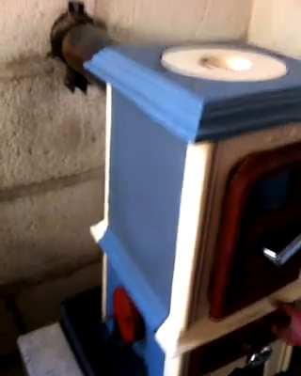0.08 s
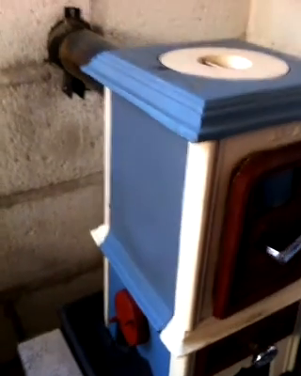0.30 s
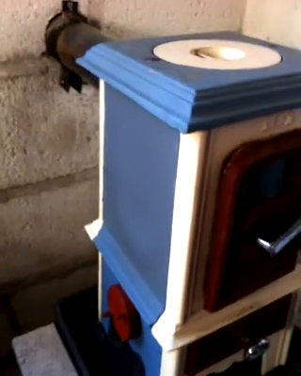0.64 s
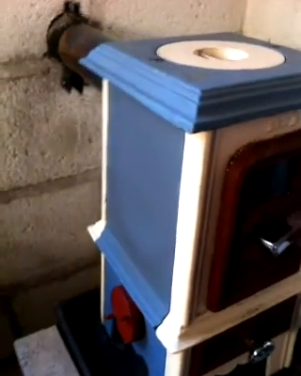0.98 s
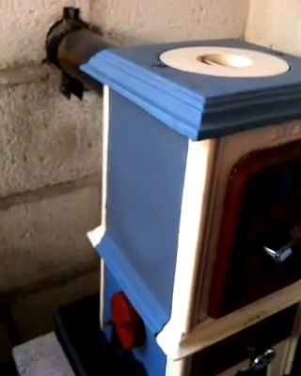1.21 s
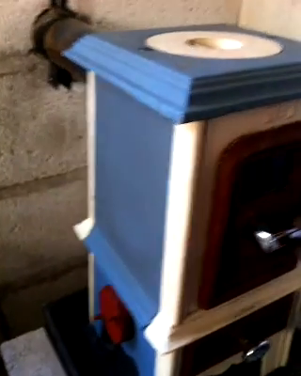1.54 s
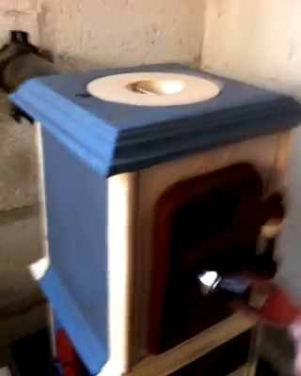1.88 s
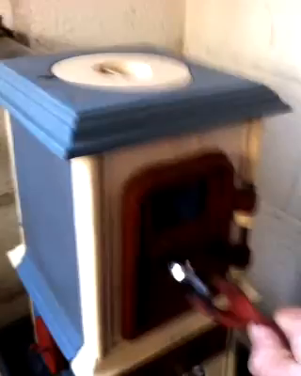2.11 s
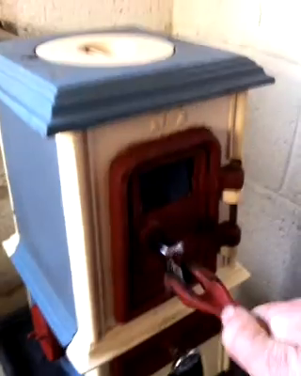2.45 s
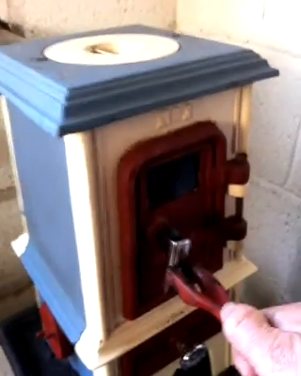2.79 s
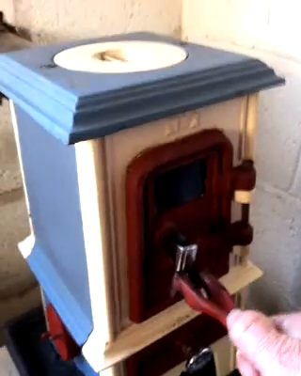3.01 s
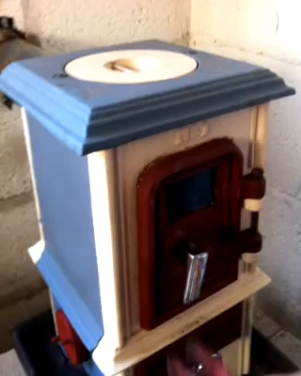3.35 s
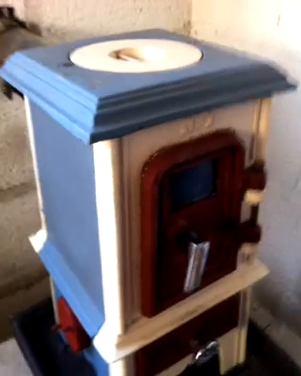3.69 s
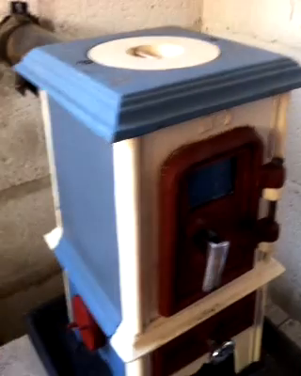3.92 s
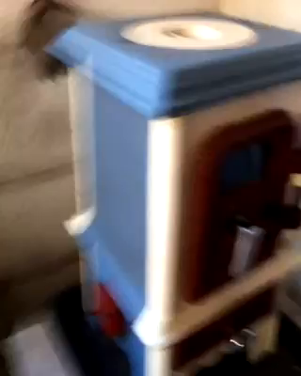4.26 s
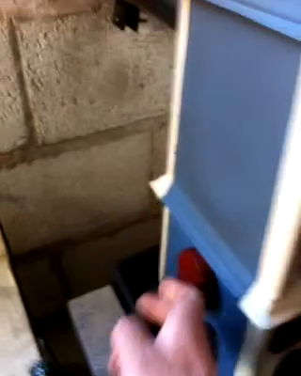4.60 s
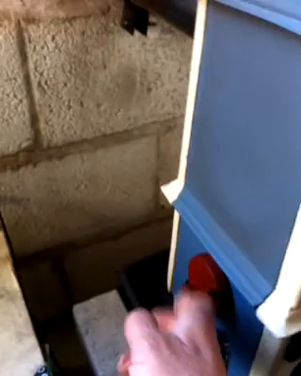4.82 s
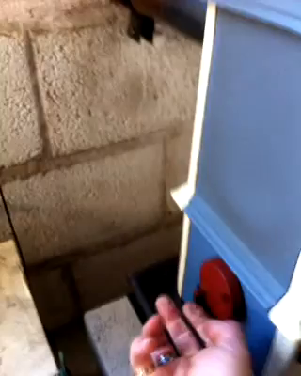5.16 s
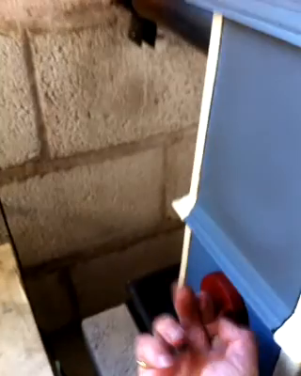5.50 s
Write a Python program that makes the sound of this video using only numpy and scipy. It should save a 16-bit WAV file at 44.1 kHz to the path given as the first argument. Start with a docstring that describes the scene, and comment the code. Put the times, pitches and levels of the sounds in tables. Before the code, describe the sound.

Fingers rub and tick on a hand-held microphone in a quiet garage. Then come scattered clusters of close, ringing clinks and scrapes as an iron tool works a small stove's door handle, with a faint rising squeak. Two louder clanks follow as the tool is put down, then the stove's air wheel rattles and settles. Faint sleeve rustle and room air lie underneath.

```python
"""Fingers rub and tick on a hand-held camera's case and a sleeve rustles, over faint room air.
Close by, an iron lifting tool clinks and scrapes on the latch of a small cast-iron stove; a pivot squeaks.
The tool turns the door handle and clanks down on the tray; then the air wheel rattles and rocks to rest.
Every contact chatters briefly and rings the iron's modes; the garage's block walls add a short echo."""
import sys
import numpy as np
from scipy import signal
from scipy.fft import rfft, irfft, next_fast_len
from scipy.io import wavfile

SR = 44100
rng = np.random.default_rng(int(sys.argv[2]) if len(sys.argv) > 2 else 0)


def write(x):
    x = np.atleast_2d(x).T
    wavfile.write(sys.argv[1], SR, np.round(np.clip(x, -1, 1) * 32767).astype(np.int16))


N = 251811
RING_N = int(.5 * SR)
TIME_S = np.arange(N) / SR
AGE_S = np.arange(RING_N) / SR


def undb(db):
    """Decibels to gain."""
    return 10 ** (np.asarray(db) / 20)


def unit_rms(x):
    """Scale to rms 1."""
    return x / np.sqrt(np.mean(x ** 2))


def decay(t60_s):
    """Exponential envelope, RING_N samples."""
    return np.exp(-np.log(1000) * AGE_S / t60_s)


def add(out, time_s, sound):
    """Mix a sound in at time_s."""
    start = max(int(time_s * SR), 0)
    out[start:start + len(sound)] += sound[:len(out) - start]


def colour(x, points):
    """Minimum-phase filter through (frequency [Hz], gain [dB]) points."""
    size = next_fast_len(len(x) + RING_N, True)
    size += size % 2
    hz, db = np.transpose(points)
    bin_hz = np.arange(size // 2 + 1) * SR / size
    gain = undb(np.interp(np.log(bin_hz + 1), np.log(hz), db))
    cepstrum = irfft(np.log(gain))
    cepstrum[1:size // 2] *= 2
    cepstrum[size // 2 + 1:] = 0
    return irfft(rfft(x, size) * np.exp(rfft(cepstrum)))[:len(x)]


# Finger pushes on the case: (time [s], level [dB])
FINGER_TICKS = [(0.0751, -33.5), (.117, -47), (.852, -40), (1.7667, -31), (1.875, -37), (4.24, -35),
                (4.2569, -28.5), (4.3185, -33.5)]


def fingers(half_width_s=.00028, lead_s=.0041, grip_db=-57, hold_s=.097, release_db_per_s=130):
    """Dry pushes reach the microphone through the case; a low rub dies as the grip settles."""
    pushes = np.zeros(N)
    pulse = -np.exp(-(AGE_S / half_width_s - 3) ** 2)
    for time_s, db in FINGER_TICKS:
        start_s = time_s - 3 * half_width_s
        add(pushes, start_s - lead_s, undb(db - 11) * pulse)  # lighter touch first
        add(pushes, start_s, undb(db) * pulse)
    ticks = signal.sosfilt(signal.butter(2, 170, "high", fs=SR, output="sos"), pushes)
    rub_spectrum = [(70, -34), (180, -7.5), (280, -6.5), (600, -13), (1400, -17.5), (4000, -34)]
    rub = unit_rms(colour(rng.standard_normal(N), rub_spectrum))
    grip = undb(grip_db - release_db_per_s * np.maximum(TIME_S - hold_s, 0))
    return ticks + rub * grip


# Arm moves: (centre time [s], level [dB], half-width [s])
SLEEVE_STROKES = [(.1, -63, 0.52), (1.4, -63, 0.48), (2.448, -70.5, 0.51), (4.0, -58.5, 0.38),
                  (4.5, -61.5, 0.28), (5.12, -64, 0.2), (5.58, -67, 0.15)]


def sleeve():
    """Cloth hisses, swelling and fading with each move of the arm."""
    spectrum = [(1000, -18), (4000, -10.5), (6500, -3), (8500, -.5), (9800, -8.5), (11500, -28)]
    hiss = unit_rms(colour(rng.standard_normal(N), spectrum))
    swells = [undb(db) * np.exp(-((TIME_S - centre_s) / half_width_s) ** 2)
              for centre_s, db, half_width_s in SLEEVE_STROKES]
    return hiss * np.linalg.norm(swells, axis=0)


# Still-room spectrum: (frequency [Hz], relative level [dB])
AIR_SPECTRUM = [(18, -63.5), (30, -27.5), (234, -1.5), (428, -7), (473, -6.5), (623, -7), (1230, -10),
                (2350, -13), (5800, -15), (8880, -10.5), (12000, -34), (15600, -65.5), (22000, -120)]


def room_air(rms_db=-69):
    """Steady faint noise of the still room."""
    return undb(rms_db) * unit_rms(colour(rng.standard_normal(N), AIR_SPECTRUM))


# Response to contact: part -> (bass [dB], top [dB], ring [dB], rebound [dB])
PART_RESPONSE = { "latch": (-2, 1, 2.5, -10.5), "jaw": (-10, -8, -0.5, -32), "shank": (-19, -2, -2.5, -22),
                 "pivot": (-6, -5.5, -3, -19.5), "catch": (-7, -9.5, -6, -26),
                 "spindle": (-1.5, -5.5, -3.5, -15), "handle": (-3, -13, 3, -11.5),
                 "tray": (-22.5, -6.5, 5.5, -16), "base": (-27, -9.5, 1.5, -14.5),
                 "wheel": (-28, -15, 4, -12), }
# Clinks and clanks: (time [s], part voicing it, level [dB], treble tilt [dB/oct], chatter [ms])
# The row at 3.684 s is a very faint high tick.
CLINKS = [ (0.6989, "latch", -38.5, -1.46, 5.4), (0.9317, "jaw", -32, 2, 1.4),
          (1.0448, "shank", -40.5, 5, 5.7), (1.265, "shank", -72, 9, 4.4), (1.452, "pivot", -33.5, 4, 6.2),
          (1.610, "pivot", -29, 2.4, 4.1), (1.6194, "catch", -36, 11.5, 0.77),
          (2.0096, "latch", -36.5, 1, 4.3), (2.0205, "catch", -25, 2.5, 2.2),
          (2.2765, "spindle", -37.5, -3.5, 9.4), (2.288, "spindle", -44, 3, 1),
          (2.61, "jaw", -51.5, -0.5, 10.5), (3.1117, "handle", -44, 4.5, 0.51),
          (3.684, "shank", -68, 3.5, .7), (3.7812, "tray", -24.5, -0.16, 11),
          (4.045, "base", -20.5, 0.6, 3.4), (4.439, "wheel", -26, 3.5, 7.1),
          (4.598, "wheel", -35, -0.5, 5.8), (4.665, "wheel", -31, 0.5, 8.8), ]


def clinks(rebound_s=.026, rebound_ms=5.5):
    """Yield contacts: each clink, clank or tick, then its weaker, dry rebound."""
    for time_s, part, db, tilt_db_oct, chatter_ms in CLINKS:
        rebound_db = PART_RESPONSE[part][-1]
        yield time_s, part, "hard", db, tilt_db_oct, chatter_ms
        yield time_s + rebound_s, part, "rebound", db + rebound_db, tilt_db_oct, rebound_ms


def mode_pairs(hz, t60_s, split_hz=(11, 24.2), twin_gain=.4):
    """One decaying tone per mode; uneven castings add a weaker twin that drifts out of step."""
    phase = 2 * np.pi * rng.random((len(hz), 1))
    twin_hz = hz + rng.choice([-1, 1], len(hz)) * rng.uniform(*split_hz, len(hz))
    tone = np.sin(2 * np.pi * hz[:, None] * AGE_S + phase)
    twin = np.sin(2 * np.pi * twin_hz[:, None] * AGE_S + phase)
    return (tone + twin_gain * twin) * decay(t60_s[:, None])


# Struck places: (latch, handle, tray, base, wheel)
STOVE_PLACES = ("latch", "handle", "tray", "base", "wheel")
# Ironwork modes: (frequency [Hz], t60 [s], then level [dB] at each place)
IRON_MODES = [ (247, 0.44, -25.5, -26, -2, 1, 3), (411.6, 0.25, -13.5, -21, 2.5, 5, -29),
              (639.3, .24, 0.5, 3, -4.5, 2, -5.5), (648.1, 0.27, -19.5, -18, -8, 2.5, -22),
              (862, 0.23, -15, -56, -18, -14.5, -16.5), (938, 0.26, -16, -40, -10.5, -11.5, -11),
              (966.4, 0.19, -18, -23, 7, -3, 2.5), (989, 0.13, -14, -3.5, 2.5, 3.5, 9.5),
              (1024, .20, -9, -32, -5.5, -11.5, -9), (1198, 0.27, -10, -1, -2.5, -9, -14),
              (1250, 0.26, -4.5, -1, -3, -16, 1), (1557, .22, -7, -6.5, -20.5, -22.5, -15.5),
              (1660, 0.26, -29.5, -30, 1.5, -25.5, -3), (1763, 0.19, -7, -8.5, -3, 4, -5),
              (1817, 0.36, -21.5, -30, -14, -16.5, -11), (1954, 0.22, -18.5, -39, -12.5, -7, -10),
              (2000, 0.3, -16, -39, -7, -22, -24), (2106, 0.3, -14, -19.5, -12.5, -22.5, -22),
              (2157, 0.23, -11, -19, -4.5, -18, -14.5), (2370, 0.34, -18, -22, -14, -16.5, -24),
              (2465, 0.28, -21, -33, -23, -15, -16), (2746, 0.1, -5, -5, -22.5, -20, -28.5),
              (2869, 0.27, -12.5, -21, -20, -10.5, -37.5), (3117, 0.17, -20.5, -37, -22.5, -1, -4),
              (3200, 0.15, -20.5, -27, -22.5, -3, -4.5), (3991, 0.26, -21.5, -25, -14, 4, -15.5),
              (4085, 0.1, -11.5, -12, -8, -14.5, -7.5), (4240, 0.17, -19.5, -19, -21, -11.5, -11.5),
              (4745, .23, -20.5, -31, -15, -7.5, -32.5), (5247, 0.16, -8.5, 0, 2.5, -15.5, -23), ]
# Lifting-tool overtones: (frequency [Hz], t60 [s], then level [dB] at each place)
TOOL_MODES = [ (5950, 0.092, -4, -10.5, -4.5, -8.5, -34.5), (7810, 0.13, -10.5, -9, -4, -6.5, -6.5),
              (9086, 0.12, -12.5, 2, -19, -17, -3.5), (10120, 0.1, -16.5, -6, -1.5, -13.5, -10.5), ]
# Small steel parts at the latch: part -> rows of (frequency [Hz], t60 [s], level [dB])
FITTING_MODES = { "jaw": [(1593, 0.14, -27), (2910, 0.26, -7.5), (3970, 0.115, 2), (5330, 0.1, -7.5),
                 (5740, 0.098, -10), (9100, 0.065, -0.5)], "shank": [(2750, 0.098, 7.5), (4600, 0.2, -3.5),
                 (6459, 0.1, -2.5), (7260, 0.2, -4), (8080, 0.1, -3.5), (9266, 0.035, 12.5)],
                 "pivot": [(2084, 0.25, -2.5), (2020, 0.25, -8), (2680, 0.2, -4.5), (6380, .13, -5.5),
                 (7950, 0.16, 1.5), (8560, 0.14, -5)], "catch": [(636, 0.23, -0.5), (815, 0.15, 6.5),
                 (1290, 0.099, -8), (2780, 0.098, 2.5), (5020, 0.11, 2.5), (4940, 0.25, -9.5),
                 (5325, 0.12, -1.5), (5845, 0.051, -9), (5595, 0.063, -9.5), (7800, 0.18, -14)],
                 "spindle": [(1600, 0.12, 3), (2056, 0.34, 3.5), (2298, 0.22, 2), (3720, 0.11, -1.5),
                 (4270, 0.076, -11), (6320, 0.038, 9.5), (8400, 0.068, 3.5)], }


def part_modes():
    """Each place weights the shared modes; a fitting adds its own to those of the latch."""
    hz, t60_s, *place_db = np.transpose(IRON_MODES + TOOL_MODES)
    shared = mode_pairs(hz, t60_s)
    modes = {place: undb(db)[:, None] * shared for place, db in zip(STOVE_PLACES, place_db)}
    for part, rows in FITTING_MODES.items():
        hz, t60_s, db = np.transpose(rows)
        own = undb(db)[:, None] * mode_pairs(hz, t60_s)
        modes[part] = np.vstack([modes["latch"], own])
    return modes


def chatter(chatter_ms, impacts_per_s=2500):
    """Rough faces meet in a run of tiny dying impacts; energy 1."""
    taps = rng.standard_normal(RING_N) * (rng.random(RING_N) < impacts_per_s / SR)
    taps[0] = 1
    taps *= np.exp(-AGE_S / (chatter_ms / 1000))
    return taps / np.linalg.norm(taps)


def clash(chatter_ms, crack_db=3.5, crack_t60_s=.035, wash_db=-4, wash_t60_s=.18):
    """Modes too dense to resolve: a crack drawn out by the contact, then a duller wash."""
    pink = [(100, 23.4), (10000, 3.4)]
    crack = colour(rng.standard_normal(RING_N), pink)
    wash = colour(rng.standard_normal(RING_N), pink)
    wash = colour(wash, [(3000, 0), (10000, -4)])
    contact = np.exp(-AGE_S / (chatter_ms / 1000))
    out = np.zeros(RING_N)
    for noise, db, t60_s in (crack, crack_db, crack_t60_s), (wash, wash_db, wash_t60_s):
        power = signal.fftconvolve(decay(t60_s) ** 2, contact / contact.sum())[:RING_N]
        out += undb(db) * np.sqrt(np.abs(power)) * noise
    return out


# Manner of contact: touch -> (tilt corner [Hz], bass [dB], ring [dB])
TOUCH_RESPONSE = {"hard": (1333, 0, 0), "rebound": (1400, 8.7, -12.5), "drag": (1400, -2, 6),
                  "soft": (750, 1.3, -4.5)}
# Contact filter points: (bass [Hz], low middle [Hz], high middle [Hz], treble [Hz], top [Hz])
BANDS_HZ = (300, 750, 1400, 5000, 8800)
# Colour common to all contacts: (frequency [Hz], gain [dB])
IRON_COLOUR = [(50, -40), (100, -23.5), (140, -12), (220, -2), (480, -6), (640, -2), (1000, 0), (1420, -1),
               (1900, -2), (3400, -4), (5200, -2.5), (6800, 0), (9000, -1.5), (11500, -23.5)]


def ironwork(weak_count=130, weak_db=-21, weak_t60_s=.071, rise_share=.2, spot_spread_db=.93):
    """Each contact rings its part's modes, a crowd of weak modes and the clash."""
    modes = part_modes()
    weak_hz = rng.uniform(1100, 10500, weak_count)
    weak_modes = mode_pairs(weak_hz, weak_t60_s * np.exp(.24 * rng.standard_normal(weak_count)))
    out = np.zeros(N)
    for time_s, part, touch, db, tilt_db_oct, chatter_ms in [*clinks(), *scrapes(), *nudges(), *rocks()]:
        bass_db, top_db, ring_db, _ = PART_RESPONSE[part]
        corner_hz, touch_bass_db, touch_ring_db = TOUCH_RESPONSE[touch]
        crowd = undb(weak_db) * rng.standard_normal(weak_count) @ weak_modes
        rattle = signal.fftconvolve(crowd, chatter(chatter_ms))[:RING_N] + clash(chatter_ms)
        # strong modes build while the faces touch; no two contacts land on the same spot
        rise = 1 - np.exp(-AGE_S / (rise_share * chatter_ms / 1000))
        spot_db = spot_spread_db * rng.standard_normal(len(modes[part]))
        ring = rise * (undb(ring_db + touch_ring_db + spot_db) @ modes[part])
        # heavy push: bass; hard edge: treble
        octaves = np.maximum(np.log2(np.array(BANDS_HZ) / corner_hz), 0)
        bands_db = tilt_db_oct * octaves + [bass_db + touch_bass_db, 0, 0, 0, top_db]
        add(out, time_s, undb(db) * colour(ring + rattle, list(zip(BANDS_HZ, bands_db))))
    return colour(out, IRON_COLOUR)


def garage(x, wet_db=-14, t60_s=.28, delay_s=.0016):
    """Close block walls add a short dense echo."""
    impulse = rng.standard_normal(RING_N) * decay(t60_s) * (AGE_S > delay_s)
    echo = signal.fftconvolve(x, impulse / np.linalg.norm(impulse))[:N]
    return x + undb(wet_db) * echo


def squeak(start_s=.85, length_s=.085, edge_s=.017, start_hz=535, rise_hz_per_s=1500, rms_db=-55):
    """A dry pivot gives one soft rising note as it starts to turn."""
    phase = 2 * np.pi * np.cumsum(start_hz + rise_hz_per_s * AGE_S) / SR
    envelope = np.clip(np.minimum(AGE_S, length_s - AGE_S) / edge_s, 0, 1)
    out = np.zeros(N)
    add(out, start_s, np.sqrt(2) * undb(rms_db) * envelope * np.sin(phase))
    return out


# Tool sliding on iron: (time [s], length [s], part, level [dB], treble tilt [dB/oct])
TOOL_SCRAPES = [ (0.984, .04, "jaw", -40, 0), (1.179, .02, "jaw", -51.5, 1.5),
                (1.358, .02, "latch", -57, -0.5), (1.4229, .07, "pivot", -36, 3),
                (2.414, .02, "spindle", -47, -6), (2.691, .02, "jaw", -62.5, 1.5),
                (2.997, .02, "handle", -63.5, 5), (3.058, .04, "handle", -44.5, 2.4), ]


def scrapes(slip_s=.026, chatter_ms=20, loss_db=2, dulling_db_oct=2):
    """Yield contacts: the tool bites; longer slides drag on in slips, weaker and duller as it slows."""
    for time_s, length_s, part, db, tilt_db_oct in TOOL_SCRAPES:
        for k, lag_s in enumerate(np.arange(0, length_s, slip_s)):
            touch = "drag" if k else "hard"
            yield (time_s + lag_s, part, touch,
                   db - k * loss_db, tilt_db_oct - k * dulling_db_oct, chatter_ms)


# Padded contacts: (time [s], part, level [dB])
SOFT_NUDGES = [(1.24, "latch", -52), (1.914, "latch", -57.5), (2.182, "jaw", -41.5),
               (4.285, "wheel", -43.5), (4.387, "base", -32), (4.543, "wheel", -36), (4.734, "wheel", -40)]


def nudges(tilt_db_oct=-10, chatter_ms=3.7):
    """Yield contacts: single padded nudges with little treble."""
    for time_s, part, db in SOFT_NUDGES:
        yield time_s, part, "soft", db, tilt_db_oct, chatter_ms


# Loose pieces: (time [s], part, level [dB], first gap [s], loss per rock [dB])
ROCKING_PIECES = [(3.867, "tray", -36, .052, 7), (4.767, "wheel", -36.5, .027, 2.5)]


def rocks(count=4, gap_ratio=.9, limp_db=-4.5, tilt_db_oct=-10, chatter_ms=2.3):
    """Yield contacts: a loose piece rocks to rest ever faster, limping on uneven feet."""
    for time_s, part, db, gap_s, loss_db in ROCKING_PIECES:
        for k in range(count):
            rock_db = db - k * loss_db + (k % 2) * limp_db
            yield time_s, part, "soft", rock_db, tilt_db_oct, chatter_ms
            time_s += gap_s * gap_ratio ** k


def scene():
    """Mono mix: stove with garage echo; fingers, sleeve and air dry."""
    air = room_air()
    stove = garage(ironwork() + squeak())
    return (fingers() + sleeve() + air + stove)[None]


def record(dry, cutoff_hz=12000):
    """The camera cuts the top with a steep low-pass."""
    return signal.sosfilt(signal.ellip(8, .2, 70, cutoff_hz, fs=SR, output="sos"), dry)


dry = scene()
out = record(dry)
write(out)
```